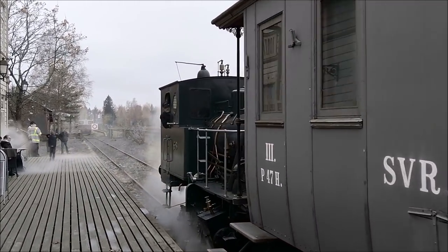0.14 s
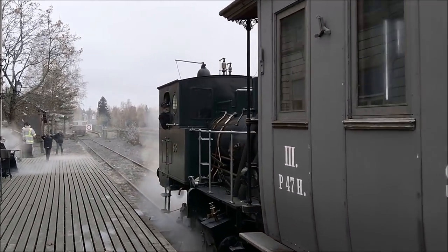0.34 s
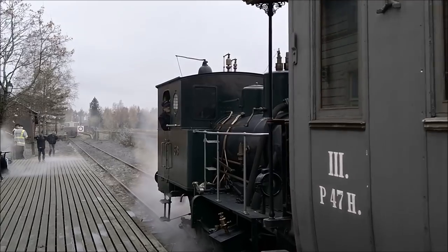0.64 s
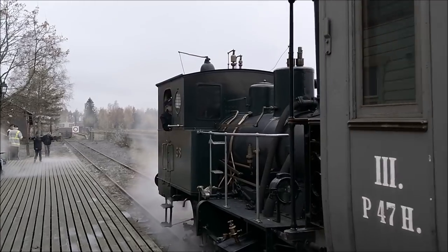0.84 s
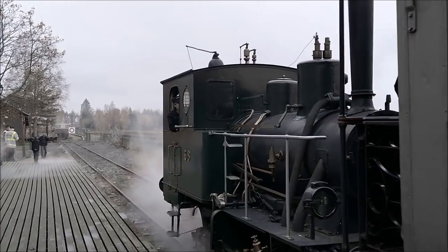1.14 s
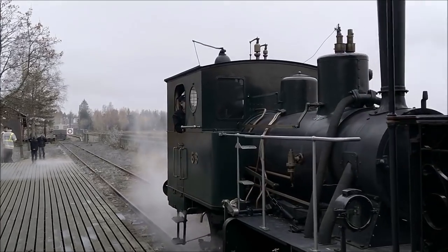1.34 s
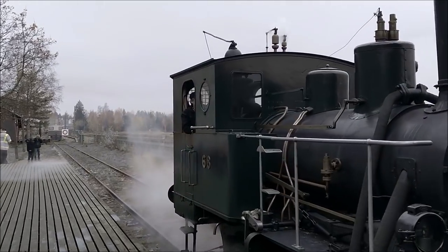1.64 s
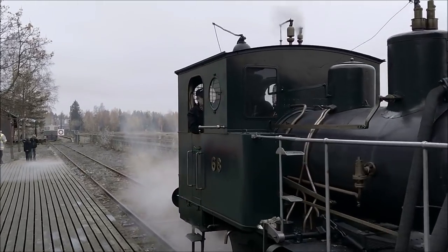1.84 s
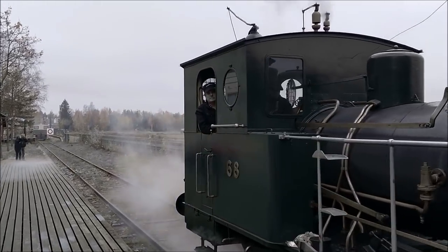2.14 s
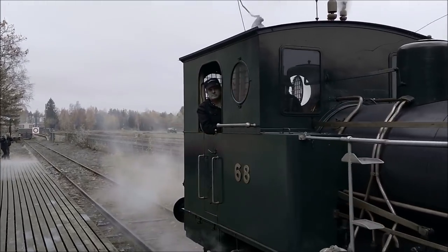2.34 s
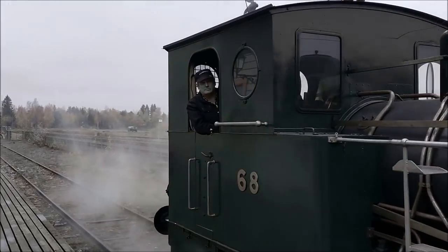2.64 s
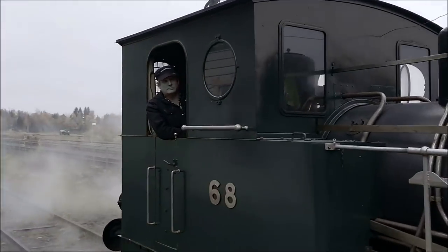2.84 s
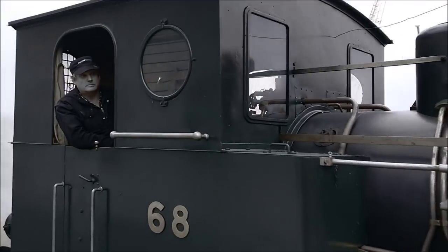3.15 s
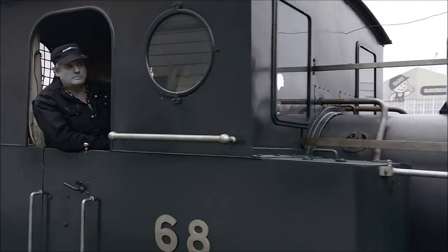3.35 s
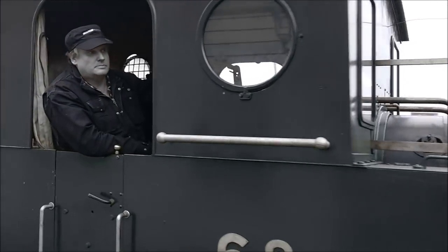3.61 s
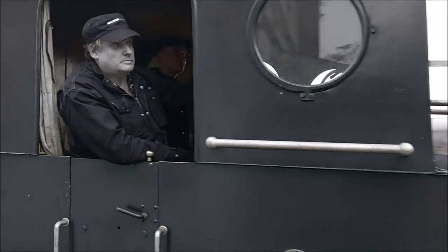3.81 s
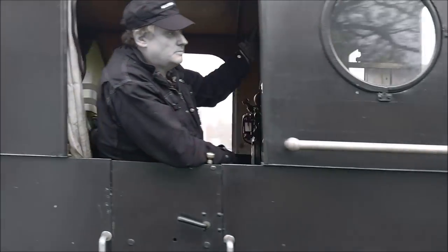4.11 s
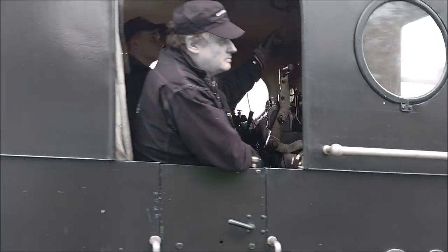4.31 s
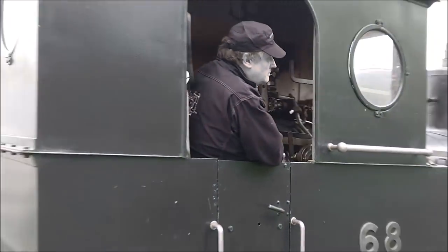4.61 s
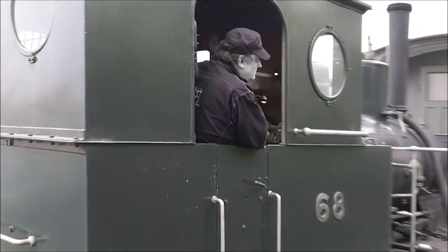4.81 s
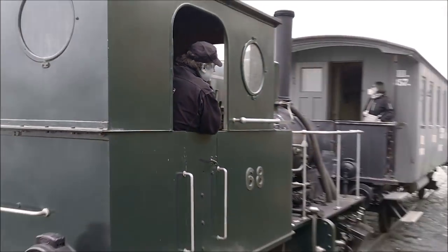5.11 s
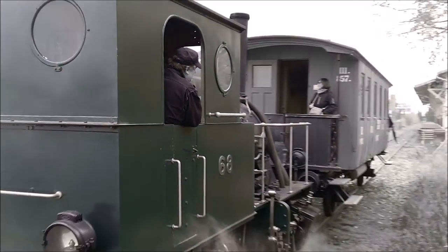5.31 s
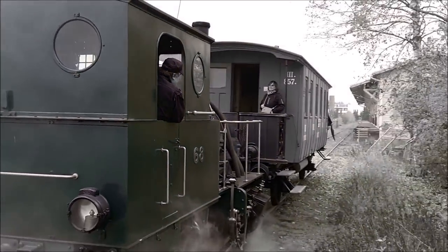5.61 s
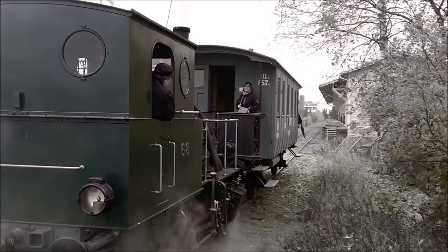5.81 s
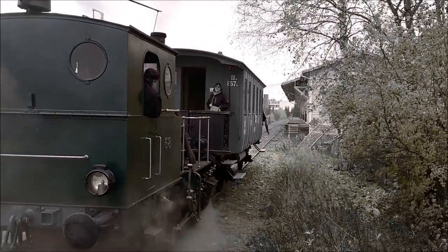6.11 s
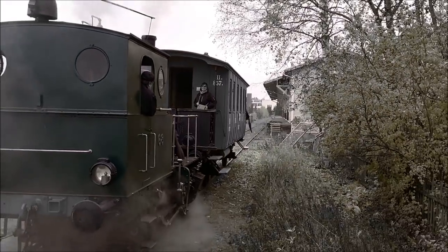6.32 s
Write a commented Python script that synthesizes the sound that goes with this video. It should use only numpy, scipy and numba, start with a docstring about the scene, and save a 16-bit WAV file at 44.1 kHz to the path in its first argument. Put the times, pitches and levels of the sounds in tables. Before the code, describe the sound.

A small steam engine chuffs and rumbles past with knocking rods, then its whistle opens in a steam rush, climbs and screams on to the end.

```python
"""A small steam engine rolls past on rumbling wheels: shaped noise, with ringing thumps at the rail joints.
Exhaust chuffs and hissing leaks are noise in narrow bands; knocking rods set the frame ringing.
Its whistle valve opens with a rush of noisy steam; the near-sine tone climbs in steps, holds and sags.
The yard echoes the tone through delay lines, and a gain control pulls everything down while it screams."""
import sys
import numpy as np
from scipy import signal
from scipy.fft import rfft, irfft, next_fast_len
from scipy.io import wavfile
from scipy.ndimage import uniform_filter1d, map_coordinates
from numba import njit

SR = 44100
rng = np.random.default_rng(int(sys.argv[2]) if len(sys.argv) > 2 else 0)


def wrap_up_sound(samples):
    """Save the sound to the file named by the first command line argument, as 16-bit audio."""
    columns = np.atleast_2d(samples).T
    # keep every value between -1 and 1, then stretch to whole-number steps
    tamed = np.clip(columns, -1, 1)
    steps = np.round(tamed * 32767).astype(np.int16)
    wavfile.write(sys.argv[1], SR, steps)


N = 284886
T = np.arange(N) / SR  # time of every sample, s

# In the tables t60 is the time to fade by 60 dB; levels are those before the gain control.


def undb(db):
    """Turn decibels into a plain gain."""
    return 10 ** (np.asarray(db) / 20)


def level(x, db):
    """Scale a sound to an rms level in dB."""
    return x * undb(db) / np.sqrt(np.mean(x ** 2))


def curves(table):
    """Join the points of a table by straight lines: one curve for each column after the time."""
    s, *columns = np.transpose(table)
    return [np.interp(T, s, c) for c in columns]


def band(x, hz, width):
    """Keep a narrow band, as a resonance does; filtered twice, gain 1 at the centre."""
    b, a = signal.iirpeak(hz, hz / width, SR)
    once = signal.lfilter(b, a, x)
    return signal.lfilter(b, a, once)


def walk(rate):
    """Wander at random: a new value rate times a second, smoothed twice; spread near 1."""
    hold = int(SR / rate)
    steps = np.repeat(rng.standard_normal(N // hold + 1), hold)
    smooth = uniform_filter1d(uniform_filter1d(steps, hold), hold)
    return 1.27 * smooth[:N]


ALIKE_BELOW_HZ = 540
PORTS_UNLIKE, BASS_UNLIKE = 0.48, 0.037  # share of left-right difference in treble, bass


def noise():
    """Stereo white noise, nearly alike left and right in the bass, partly unlike above."""
    mid, side = rng.standard_normal((2, N))
    high_pass = signal.butter(2, ALIKE_BELOW_HZ, "high", fs=SR)
    side = PORTS_UNLIKE * signal.lfilter(*high_pass, side) + BASS_UNLIKE * side
    return np.array([mid + side, mid - side])


def coloured(x, spectrum, flicker_db, surge_db):
    """Shape noise by (f/Hz, level/dB) points; half-octave slices surge together and flicker alone."""
    hz, db = np.transpose(spectrum)
    size = next_fast_len(N)
    octave = np.log2(np.maximum(np.fft.rfftfreq(size, 1 / SR), 1))
    shaped = rfft(x, size) * undb(np.interp(octave, np.log2(hz), db))
    out = 0
    for centre in np.arange(np.floor(np.log2(hz[0])), 14.6, 0.5):
        slice_gain = np.clip(1 - 2 * abs(octave - centre), 0, 1)  # triangles that overlap
        part = irfft(shaped * slice_gain, size)[:, :N]
        out = out + part * undb(flicker_db * walk(9))
    return level(out * undb(surge_db * walk(5.64)), 0)


def swell(s, rise, t60):
    """Loudness curve that rises smoothly from time s, then dies away."""
    age = np.maximum(T - s, 0)
    fall = np.exp(-np.log(1000) * np.maximum(age - rise, 0) / t60)
    return np.minimum(age / rise, 1) ** 2 * fall


def strike(blows, modes, push_s):
    """Blows (t/s, level/dB) ring fading sines (f/Hz, level/dB, t60/s); pitch and level vary each time."""
    out = np.zeros(N)
    chance = rng.standard_normal((len(blows), len(modes), 2))
    age = T[T < 0.5]
    for (s, peak_db), draws in zip(blows, chance):
        ring = 0
        for (hz, db, t60), (louder, sharper) in zip(modes, draws):
            sine = np.sin(2 * np.pi * hz * (1 + 0.049 * sharper) * age)
            ring = ring + undb(db + 1.5 * louder) * sine * 1000.0 ** (-age / t60)
        part = out[int(s * SR):][:len(age)]
        blow = undb(peak_db) * np.minimum(age / push_s, 1) * ring
        part += blow[:len(part)]
    return out


# colour of the rolling noise: f/Hz, level/dB per Hz
ROLL_COLOUR = [(25, -2), (55, -0.5), (140, -5), (300, -8.5), (500, -17), (720, -13), (1300, -18),
               (2600, -25.5), (3900, -25), (6500, -36.5), (9500, -52.5), (16000, -54)]
# part below 70 Hz, from the carriages: t/s, level/dB against the plain roll
DEEP_RUMBLE = [(0, -7), (1.5, -20), (2.2, -14), (3.0, -3.5), (5.5, 1.5), (6.46, -10)]
# wheels dropping over rail joints: t/s, level/dB
RAIL_JOINTS = [(.13, -13), (.44, -15), (.60, -18), (.77, -20), (1.24, -18), (1.45, -24), (1.92, -29)]
# ground ringing under the wheels: f/Hz, level/dB, t60/s
GROUND_MODES = [(49, 8, 0.25), (64, -13, 0.19)]
# hissing glands: f/Hz, width of each filter pass/Hz, level/dB when abreast
GLAND_LEAKS = [(4520, 170, -36.5), (7870, 590, -40.5), (12000, 1300, -45.5), (14500, 1500, -45)]
ROLL_DB = -22.5  # before the deep part is reshaped
LEAK_RISE_DB_PER_S, ABREAST_S = 7, 1.64  # the glands come nearer until the engine is abreast


def train():
    """Wheels and carriages rumble and thump over joints; loose glands hiss in narrow bands."""
    roll = level(coloured(noise(), ROLL_COLOUR, 2.0, 2.7), ROLL_DB)
    deep = signal.sosfilt(signal.butter(2, 70, fs=SR, output="sos"), roll)
    deep_gain = undb(curves(DEEP_RUMBLE)[0])
    rumble = roll + deep * (deep_gain - 1) + strike(RAIL_JOINTS, GROUND_MODES, 0.034)
    gas = noise()
    near = undb(LEAK_RISE_DB_PER_S * np.minimum(T - ABREAST_S, 0))
    hiss = 0
    for hz, width, db in GLAND_LEAKS:
        hiss = hiss + level(band(gas, hz, width), db) * undb(2.7 * walk(3.7))
    return rumble + near * hiss


# exhaust chuffs: t/s, puff level/dB, valve snap level/dB
CHUFF_TIMES = [(0.128, -20, -30), (.335, -24, -38), (0.582, -17, -26), (0.762, -23.5, -38),
               (1.003, -19, -20), (1.197, -20, -14), (1.43, -11.5, -18), (1.608, -24.5, -14),
               (1.844, -13.5, -11), (2.05, -43, -40), (2.271, -14.5, -10)]
# strong and weak puffs, taken in turn: rise/s, fall t60/s
PUFF_SHAPES = [(0.032, 0.42), (0.013, 0.65)]
# chimney resonances: f/Hz, width of each filter pass/Hz, level/dB against each other
CHIMNEY = [(1810, 730, 5), (2926, 980, 8.5), (4220, 750, 3), (2374, 870, 4.5), (680, 460, -1.5)]
# slide valve chest resonances: f/Hz, width of each filter pass/Hz, level/dB against each other
VALVE_CHEST = [(2980, 480, 0.5), (1890, 270, -2.5), (4350, 1200, -5)]


def resonate(air, modes):
    """Sum the bands that a hollow space brings out of noise, at rms 0 dB."""
    return level(sum(level(band(air, hz, width), db) for hz, width, db in modes), 0)


def chuffs():
    """The valve snaps open, then a gritty puff of exhaust steam swells in the chimney."""
    air = noise() * undb(1.8 * walk(70))
    gas, snap = resonate(air, CHIMNEY), resonate(air, VALVE_CHEST)
    puffs = snaps = 0
    for (s, puff_db, snap_db), (rise, t60) in zip(CHUFF_TIMES, PUFF_SHAPES * len(CHUFF_TIMES)):
        # the power 0.4 rounds the rise and gives back the listed fall time
        puffs = puffs + undb(puff_db) * swell(s, rise, t60 * 0.4) ** 0.4
        snaps = snaps + undb(snap_db) * swell(s, 0.0017, 0.058)
    return gas * puffs + snap * snaps


# rod knocks: t/s, level/dB, bass against it level/dB
ROD_KNOCKS = [(0.316, -17, 2.5), (0.803, -22.5, 1), (1.238, -22, -14), (1.647, -22, -2), (2.036, -16, 5),
              (2.659, -16.5, 0.5), (3.63, -19, -7), (4.001, -20.5, -7), (4.36, -25, -3), (4.719, -24, -9),
              (5.806, -19.5, -17), (6.144, -19, -16), (6.299, -16, -8)]
# ringing engine frame: f/Hz, level/dB, t60/s
FRAME_MODES = [(365, -0.5, 0.13), (512, -17, 0.067), (750, 13, 0.016), (830, -1, 0.034), (1097, -5, 0.36),
               (1274, 4.5, 0.087), (1650, 2, 0.054), (1960, -14, 0.018), (265, 3, 0.21), (172, 7, 0.11)]
# thump through the track: f/Hz, level/dB, t60/s
THUD_MODES = [(95, 2, 0.3), (125, -3, 0.2)]
FULL_BLOW_DB, RING_SLOPE = -11, 0.27  # softer blows ring less: extra dB lost per dB under a full blow


def knocks():
    """Rods slam in their bearings: the blow rings the frame, thumps through the track and rattles."""
    ring_blows = [(s, db + RING_SLOPE * (db - FULL_BLOW_DB)) for s, db, _ in ROD_KNOCKS]
    frame = strike(ring_blows, FRAME_MODES, 0.0025)
    thud = strike([(s, db + bass_db) for s, db, bass_db in ROD_KNOCKS], THUD_MODES, 0.00053)
    loose = level(band(noise(), 750, 1400) * undb(3.5 * walk(90)), 2.4)
    rattle = loose * sum(undb(db) * swell(s, 0.0041, 0.38) for s, db, _ in ROD_KNOCKS)
    return undb(0.5) * frame + thud + rattle


# steam at the whistle lip: t/s, level/dB of body and top, top octave against body level/dB
# (9.1 dB is then added to the body and 0.1 dB to the top)
LIP_JET = [(1.7, -16.5, 1), (1.86, -25, -1), (2.07, -29, -4.5), (2.17, -26, -2.5), (2.42, -20.5, -0.5),
           (2.52, -23, -1), (2.7, -21.5, 1.5), (2.87, -22.5, 7), (3.16, -21, 4.5), (3.3, -25, -1),
           (4.2, -25, -2), (4.38, -23.5, -1.5), (4.7, -26, 2), (4.97, -25, -2.5), (5.5, -25.5, 0),
           (6.03, -25.5, 0), (6.46, -22, 3)]
# colour of the rushing steam: f/Hz, level/dB per Hz
STEAM_COLOUR = [(820, -9), (1400, -2), (1820, -5), (2230, -7.5), (3200, -1), (3620, -4.5), (4330, -4.5),
                (6910, -14), (8390, -29), (9000, -36.5), (11700, -49), (19800, -120)]


def jet():
    """Steam rushes over the lip: a broad hiss and a thin top octave, both noise."""
    body_db, top_db = curves(LIP_JET)
    body = level(coloured(noise(), STEAM_COLOUR, 2.0, 0.6), 9.1)
    high_pass = signal.butter(4, 8000, "high", fs=SR, output="sos")
    top = level(signal.sosfilt(high_pass, noise()), 0.1)
    opening = swell(LIP_JET[0][0], 0.11, 1e3)  # opens, then practically stays
    return (body + top * undb(top_db)) * undb(body_db) * opening


# the blown whistle: t/s, f/Hz, tone level/dB
WHISTLE_BLOW = [(1.82, 824, -26), (1.88, 883, -22.5), (1.94, 985, -11), (1.99, 1052, -6.5),
                (2.08, 1079, -13), (2.15, 1012, -11.5), (2.23, 1056, -7.5), (2.36, 1013, -5),
                (2.5, 1258, 3), (2.68, 1266, 9), (2.81, 1334, 12.5), (3.74, 1344, 14.5), (4.4, 1343, 13.5),
                (4.6, 1334, 10), (5.0, 1337, 12.5), (5.46, 1330, 15.5), (5.63, 1312, 15), (5.79, 1203, 7.5),
                (6.03, 1226, 9), (6.46, 1231, 13)]
# overtones against the tone, before their flutter: t/s, second level/dB, third level/dB
WHISTLE_OVERTONES = [(2.4, -22, -42), (2.8, -16.5, -21), (3.1, -15.5, -19.5), (3.4, -25.5, -31.5),
                     (3.65, -17, -28), (4.4, -16, -23), (4.75, -14, -21.5), (4.95, -21, -22.5),
                     (5.15, -15.5, -18.5), (5.27, -24, -25), (5.4, -16.5, -20), (5.65, -26, -25),
                     (5.8, -32, -47), (6.46, -29, -31)]
# higher overtones: multiple of the pitch, level/dB against the third
HIGHER_OVERTONES = [(4, -11), (5, -20)]
BREATHY_BELOW_DB, BREATHY_DB = 5, 1.5  # a weak tone shakes more, by up to this much


def whistle():
    """The bell sings a near sine; turbulence shakes pitch and level, overtones flicker alone."""
    hz, tone_db = curves(WHISTLE_BLOW)
    second_db, third_db = curves(WHISTLE_OVERTONES)
    shaken_hz = hz + 3.0 * walk(40) + 5.0 * walk(300)
    phase = 2 * np.pi * np.cumsum(shaken_hz) / SR
    orders = [(2, second_db), (3, third_db)] + [(k, third_db + db) for k, db in HIGHER_OVERTONES]
    upper = 0
    for k, db in orders:
        # quick dropouts, deeper for the third overtone and up than for the second
        flutter_db = -1.5 * min(k, 3) * walk(60) ** 2
        upper = upper + undb(db + flutter_db + 1.5 * walk(9)) * np.sin(k * phase)
    overblown = swell(WHISTLE_OVERTONES[0][0], 0.054, 1e3)  # overtones start once the tone jumps up
    breathy_db = BREATHY_DB * np.clip((BREATHY_BELOW_DB - tone_db) / 10, 0, 1)
    shake = undb((0.79 + breathy_db) * walk(100) + 1.0 * walk(25))
    tone = np.sin(phase) * shake * swell(WHISTLE_BLOW[0][0], 0.01, 780.0)
    return np.sqrt(2) * undb(tone_db) * np.array([tone, overblown * upper])


YARD_T60_S, YARD_DAMP, YARD_DB = 1.72, 0.1, -20  # fade time before damping; treble damping; echo gain


@njit
def walls(x, lags, gain, damp):
    """Echoes between walls: eight delay lines feed each other, duller on every round."""
    line, soft, out = np.zeros((8, 16384)), np.zeros(8), np.zeros((2, len(x)))
    for i in range(len(x)):
        total = 0.
        for k in range(8):
            echo = gain[k] * line[k, (i - lags[k]) & 16383]
            soft[k] += (1 - damp) * (echo - soft[k])
            total += soft[k]
            out[k % 2, i] += soft[k]  # odd and even lines go to opposite sides
        for k in range(8):
            line[k, i & 16383] = x[i] + soft[k] - total / 4
    return out


def yard(x):
    """The yard answers with a fading echo from eight random distances."""
    lags = rng.integers(2000, 12000, 8)  # samples
    loss_db = -60 * lags / SR / YARD_T60_S
    return undb(YARD_DB) * walls(x, lags, undb(loss_db), YARD_DAMP)


# short, uneven level changes of the tone, mostly dips:
# t/s, left level/dB, right level/dB, time to shrink to 1/e of that many dB/s
TONE_DIPS = [(1.959, -14, -14, 0.0068), (2.059, -1, -7, 0.021), (2.33, -15, 0, 0.0067),
             (2.425, -4, -6, 0.019), (2.547, -8, -8, 0.01), (2.711, 3, -24, 0.0078), (2.828, -8, -8, 0.013),
             (3.198, -3, -4.5, .02), (3.415, -0.5, -5, .017), (3.56, -8, -7.5, 0.044),
             (3.69, -9, -0.5, 0.012), (3.71, -6.5, -15.5, .012), (3.80, -5.5, -6, .02),
             (3.839, -6, -6, 0.025), (4.01, -2, -15, 0.012), (4.10, -19.5, -11.5, 0.015),
             (4.217, -7, -12, 0.015), (4.309, -5, -11.5, 0.059), (4.40, -18.5, -2, 0.029),
             (4.44, -7, -17, 0.0074), (4.55, -14, -14.5, 0.0092), (5.135, -7, -4.5, 0.029),
             (5.329, -7.5, -1, 0.012), (5.467, -9, -5, 0.051), (5.678, -15.5, -12, 0.0084),
             (5.708, -4, -2, 0.0091), (5.732, -8, -15, 0.0045), (5.753, -12.5, -12, 0.013),
             (5.985, -15.5, -10.5, 0.043)]


def dips():
    """Gain of the tone on each side: pointed notches, added up in dB."""
    total_db = 0
    for s, left_db, right_db, width in TONE_DIPS:
        total_db = total_db + np.outer([left_db, right_db], np.exp(-abs(T - s) / width))
    return undb(total_db)


# the microphone turns after the engine:
# t/s, lead of the left port/ms, whistle left minus right level/dB
MIC_TURN = [(0, .12, 0), (1.5, .096, 2), (1.75, 0.038, 3.5), (2.4, 0.0021, 2), (3.2, 0.046, -0.5),
            (4.0, 0.0092, 0.5), (4.7, .029, -0.5), (5.2, .11, 3), (6.46, .16, 3)]


def ports(x):
    """Sound from the side reaches one microphone port a moment before the other."""
    lead = curves(MIC_TURN)[0] * SR / 1000  # samples
    late = map_coordinates(x[1], [np.arange(N) - lead], order=3, mode="nearest")
    return np.array([x[0], late])


def scene():
    """Engine and whistle close by, with the yard's echo of the whistle."""
    tone, upper = whistle()
    pan_db = curves(MIC_TURN)[1]
    pan = undb(np.array([pan_db, -pan_db]) / 2)
    near = (tone * dips() + upper) * pan
    return near + yard(tone + upper) + jet() + chuffs() + knocks() + train()


@njit
def follow(x, attack, release):
    """Track loudness: rise fast and sink slowly."""
    e, out = 0., np.empty(len(x))
    for i in range(len(x)):
        e += (x[i] - e) * (attack if x[i] > e else release)
        out[i] = e
    return out


MIC_LOW_HZ, TOP_HZ = 39.6, 15900
GAIN_TOP_DB, GAIN_RATIO = -9, 11.5  # above this level, 11.5 dB more in gives 1 dB more out
ATTACK_S, RELEASE_S = 0.011, 0.089


def record(dry):
    """The microphone drops deep bass, gain control holds loud sound near one level, the top is cut."""
    high_pass = signal.butter(3, MIC_LOW_HZ, "high", fs=SR, output="sos")
    heard = signal.sosfilt(high_pass, ports(dry))
    power = uniform_filter1d(np.mean(heard ** 2, 0), size=256)
    envelope = follow(np.sqrt(np.abs(power)), 1 / (ATTACK_S * SR), 1 / (RELEASE_S * SR))
    gain = np.minimum(undb(GAIN_TOP_DB) / (envelope + 1e-9), 1) ** (1 - 1 / GAIN_RATIO)
    held = np.clip(heard * gain, -1, 1)
    return signal.sosfilt(signal.ellip(8, 0.2, 70, TOP_HZ, fs=SR, output="sos"), held)


dry = scene()
out = record(dry)
wrap_up_sound(out)
```